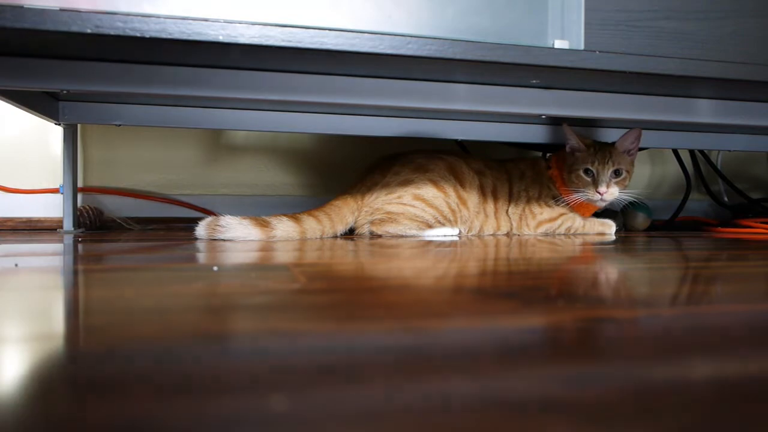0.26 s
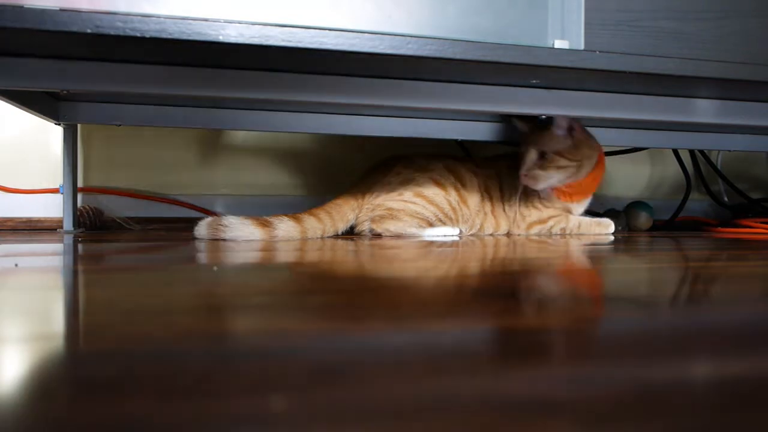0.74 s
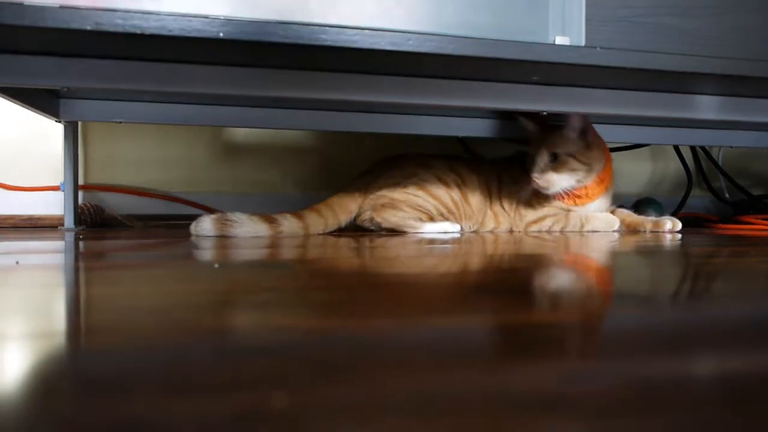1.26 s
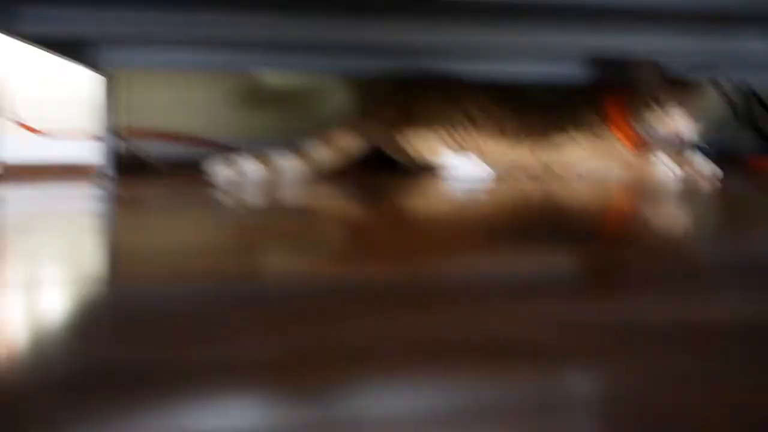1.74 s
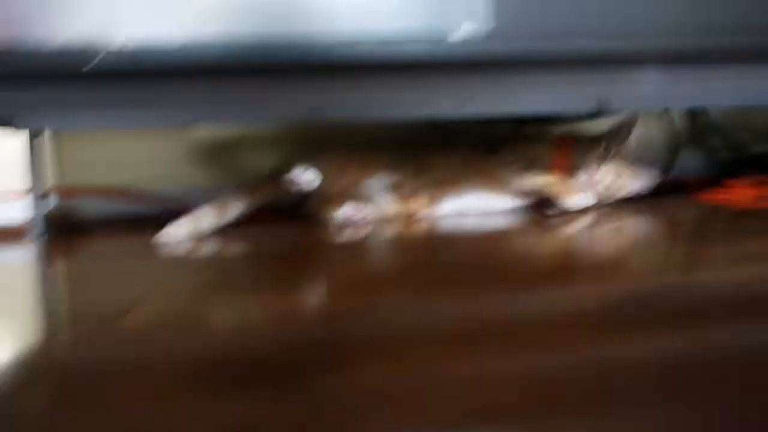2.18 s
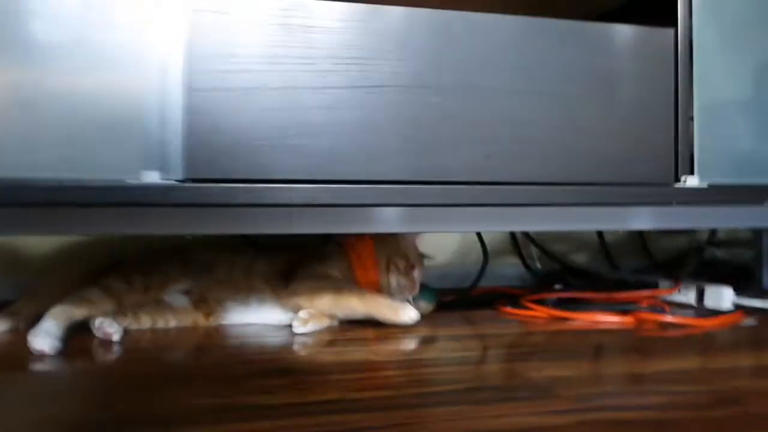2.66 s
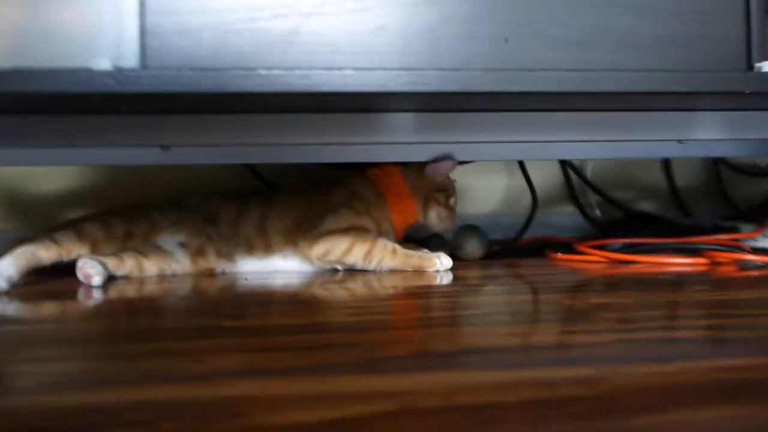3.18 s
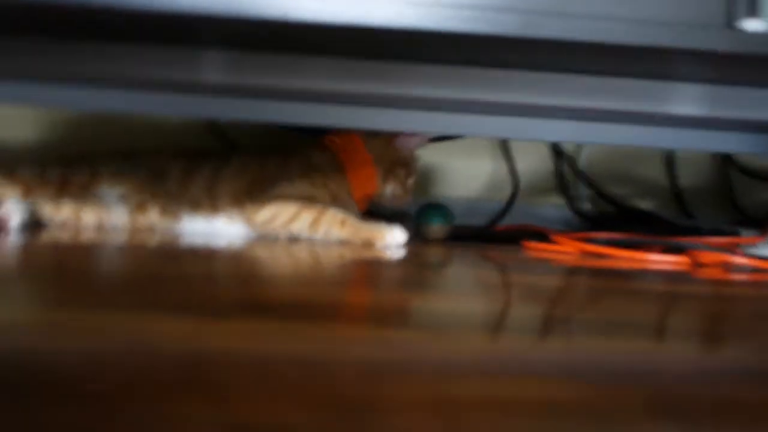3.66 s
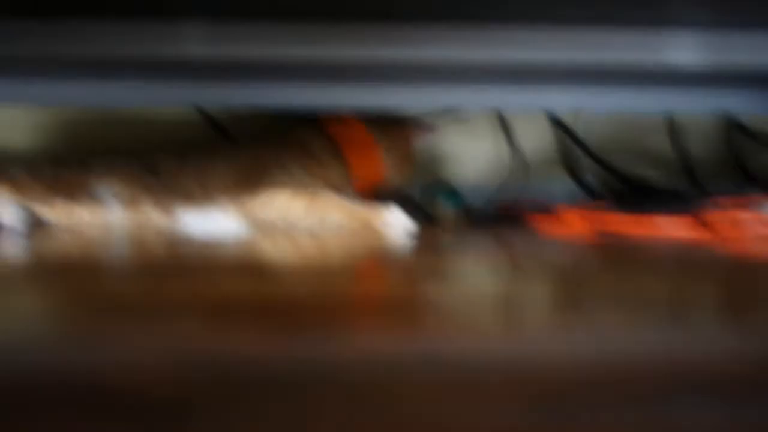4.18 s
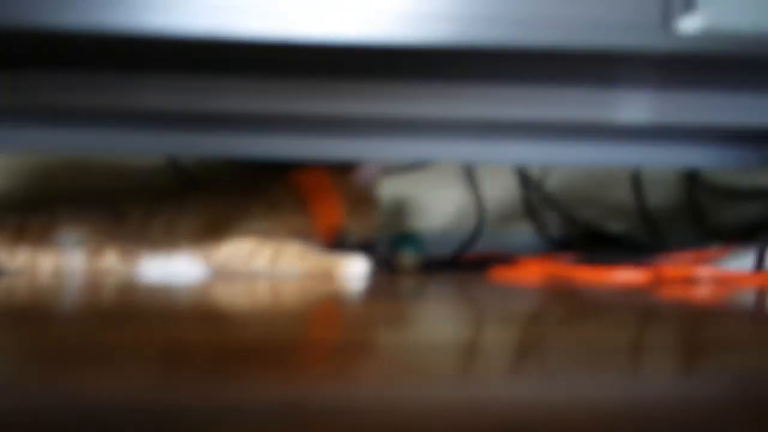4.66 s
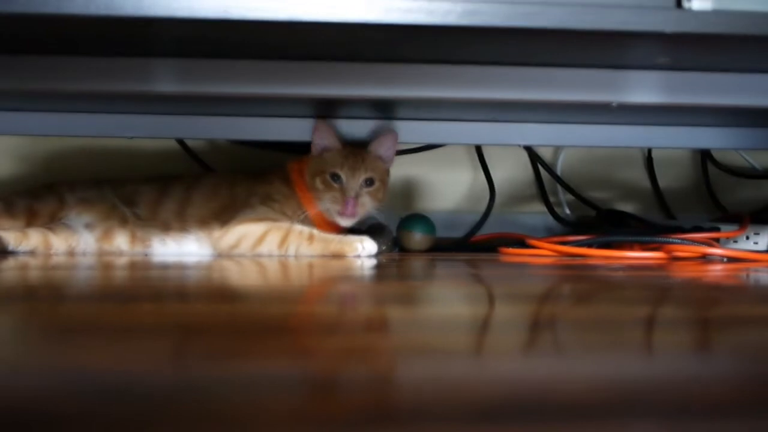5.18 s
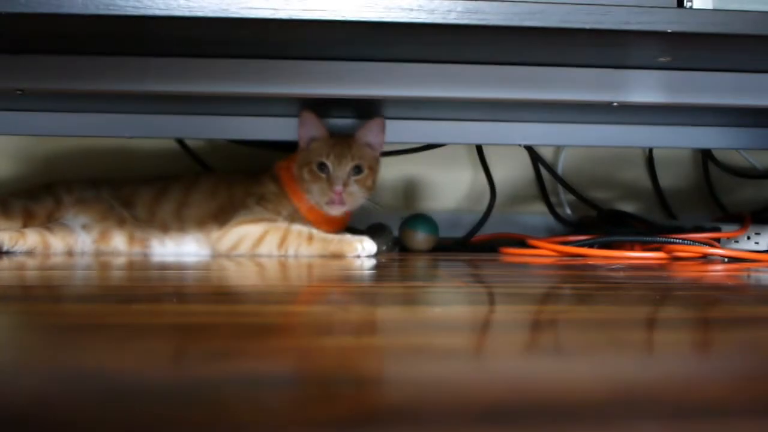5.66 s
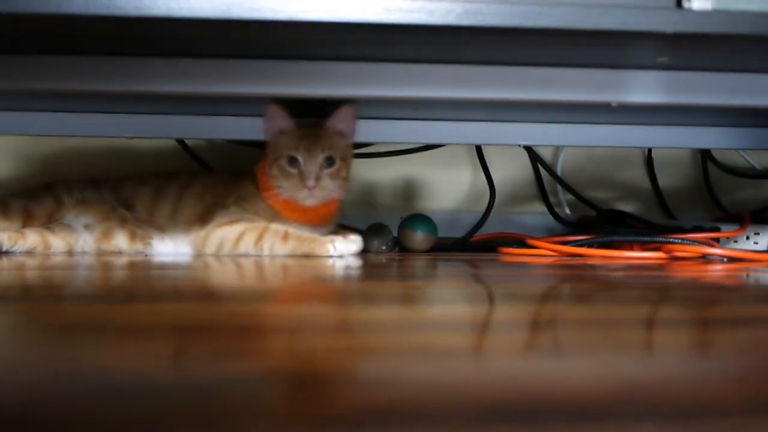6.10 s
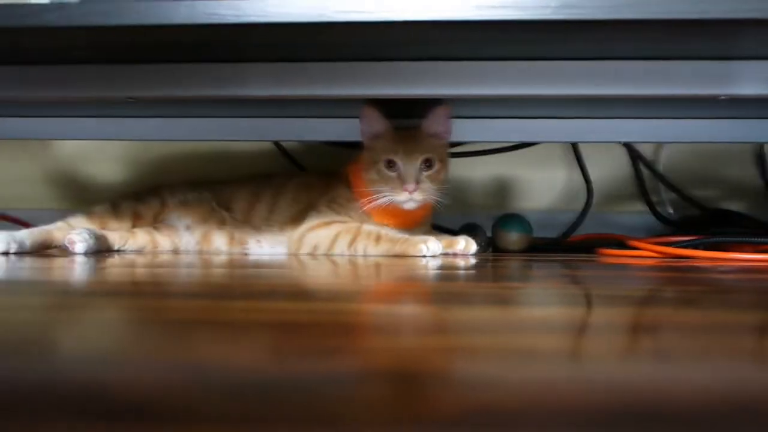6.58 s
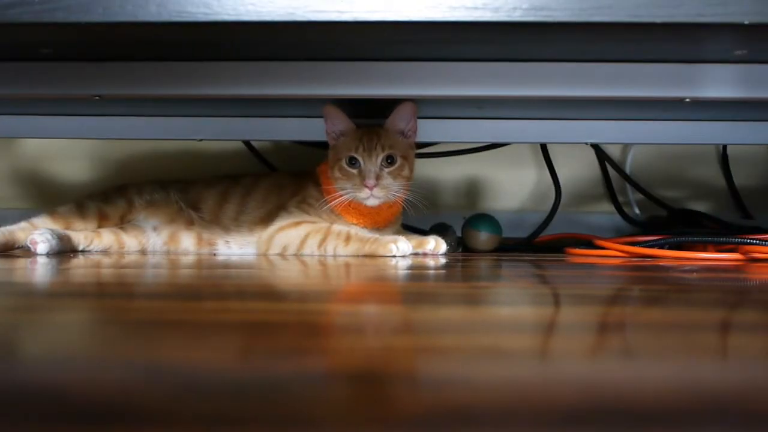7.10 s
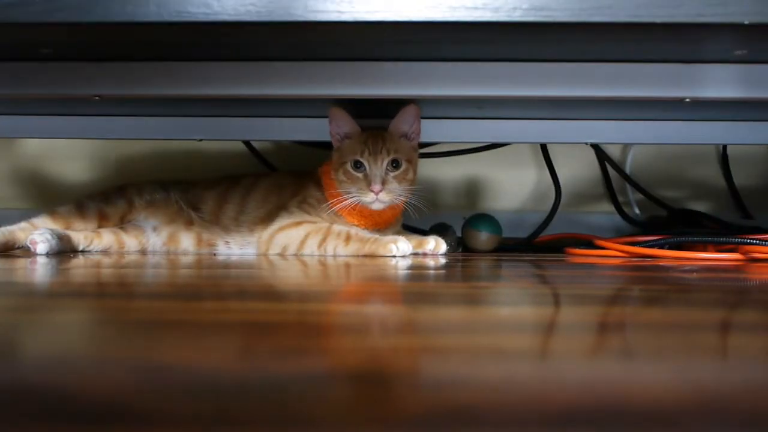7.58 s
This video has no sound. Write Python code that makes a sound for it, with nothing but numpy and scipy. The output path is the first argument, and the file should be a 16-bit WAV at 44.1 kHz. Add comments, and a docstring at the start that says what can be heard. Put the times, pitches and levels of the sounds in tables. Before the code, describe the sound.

A quiet indoor room murmurs softly throughout, with low rumble and faint hiss. From 0.7 to 1.0 seconds a cat under a low cabinet makes a few dull, padded knocks on a hardwood floor. Light finger rubs and small clicks on the microphone follow until about 1.9. Soft fur swishes and isolated paw thumps begin around 2.3; from 3.2 a short juddering skid leads into a quick flurry of knocks, strongest around 3.5 to 3.8, with small ticks and a short room echo. At 4.1 the microphone on the floor is bumped and dragged: very loud, close cracks, hollow thuds and rasping scrapes, peaking near 4.27 and continuing roughly until 5.1. Faint clicks trail to 5.4, then near quiet. Fainter rubs and light bumps return from 6.1 to 7.0, with a tiny thin squeak at 6.65. A last soft rub and a barely audible, longer squeak come around 7.4.

```python
"""A cat under a low cabinet knocks on a hard wooden floor, first briefly, then in a flurry after two seconds.
Near the first knocks, fingers rub the microphone on the floor; fur swishes softly before and into the flurry.
After four seconds the microphone is bumped and dragged, with sharp clicks and ticks; later come fainter rubs.
Two thin squeaks sound near the end, and a quiet room murmurs all along. Ringing tones make the knocks and
bumps, tiny random slips make the rubbing and the fur, and shaped noise makes the ticks, clicks and murmur."""
import sys
import numpy as np
from scipy import signal
from scipy.fft import rfft, irfft
from scipy.io import wavfile
from scipy.ndimage import uniform_filter1d, map_coordinates

SR = 44100
rng = np.random.default_rng(int(sys.argv[2]) if len(sys.argv) > 2 else 0)


def dump(signal):
    """Clip the signal to [-1, 1] and save it as 16-bit WAV at the path in sys.argv[1]."""
    limited = np.clip(np.atleast_2d(signal).T, -1, 1)
    pcm = np.round(limited * 32767).astype(np.int16)
    wavfile.write(sys.argv[1], SR, pcm)


N = 345744
TIME = np.arange(N) / SR
RING_TIME = TIME[:SR // 4]

# knocks of paws and body on the boards: [start_s, level_db, hardness_db, pitch_ratio]
PAW_KNOCKS = [(0.696, -32, -8, 0.71), (0.908, -37.5, -18, 1.17), (.936, -32.5, -19.5, 1.04),
              (.952, -34, -19, 1.1), (1.005, -27.5, 1.5, 1.13), (2.279, -30.5, 6, 1.34),
              (2.433, -34.5, -13.5, 1.22), (2.61, -43, -14, 0.61), (2.833, -25, 3.5, 1.035),
              (3.08, -37.5, -23, 1.05), (3.185, -22.5, 12.5, 1.09), (3.318, -26, -8, 1.2),
              (3.432, -25.5, -20.5, 1.053), (3.4702, -13.5, -3.5, 1.14), (3.504, -26.5, -6, 1.26),
              (3.513, -30, -12.5, 1.27), (3.594, -23.5, -12, 1.23), (3.625, -25.5, -14, 1.08),
              (3.702, -31, 15, 1.1), (3.709, -18.5, -8.5, 1.29), (3.753, -19, -4.5, 1.15),
              (3.793, -37, -9, 1.23), (3.855, -37, -18, 1.04)]
# tone of the paw juddering on the boards: [pitch_hz, level_db]
JUDDER_TONE = [(110, -27), (220, -10.5), (310, -2.5), (380, 7), (440, -2), (660, -21), (860, -18.5),
               (1010, -8.5), (1250, -32.5), (2600, -40), (4000, -45), (7000, -52), (12000, -80)]
# the skid of one paw, which weakens as it goes on
SKID_S, SKID_LENGTH_S, SKID_DB, SKID_SWELL_DB = 3.182, 0.15, -33.5, -12.5
SKID_ATTACK_S, SKID_RELEASE_T60_S = 0.0074, 0.09


def paws():
    """Knocks and a juddering skid ring the boards, and the room answers."""
    knocks = np.zeros((1, N))
    for start_s, level_db, hardness_db, pitch_ratio in PAW_KNOCKS:
        add(knocks, start_s, undb(level_db) * board(hardness_db, pitch_ratio))
    skid = push(SKID_S, SKID_LENGTH_S, SKID_DB, SKID_SWELL_DB, SKID_ATTACK_S, SKID_RELEASE_T60_S)
    slipping = slips(rate=1200, uneven=0.067, surge=0.067, surge_rate=70)
    judder = colour(slipping, JUDDER_TONE) * skid
    return knocks + judder + room(undb(-11.5) * knocks + undb(-9.5) * judder)


# what the boards ring with, before each blow varies it: [pitch_hz, level_db, t60_s]
BOARD_RINGS = [(160.3, -11.5, 0.13), (288.3, 3, 0.06), (358.7, 2, 0.06), (457, 4, 0.024),
               (622, -3.5, 0.029), (777, -1, 0.028), (984, -19, 0.046), (1160, -17, 0.0068)]
CONTACT_S = 0.00042  # limit for the hardest blow; a softer one pushes longer
PAD_HZ = 1340  # the soft paw dulls everything above this
SPOT_DB, SPOT_DETUNE = 2, 0.04  # scatter from spot to spot: dB, share of the pitch


def board(hardness_db, pitch_ratio=1):
    """One padded blow: hardness brings out the upper modes; each spot weights and detunes them anew."""
    contact_s = CONTACT_S * (1 + undb(-hardness_db))
    blow = 0
    for pitch_hz, level_db, t60_s in BOARD_RINGS:
        weight, detune = rng.standard_normal(2)
        octaves_up = np.clip(np.log2(pitch_hz / 350), -0.5, 1)
        gain = undb(level_db + hardness_db * octaves_up + SPOT_DB * weight)
        blow = blow + gain * ring(pitch_hz * pitch_ratio * (1 + SPOT_DETUNE * detune), t60_s, rise=contact_s)
    padded = edge(blow, PAD_HZ, "low", order=4)
    padded = edge(padded, 170 * pitch_ratio, "high")
    return padded / np.abs(padded).max()


# fur slides over the varnish: [fastest_moment_s, length_s, relative_level_db]
FUR_SWISHES = [(2.398, 0.013, -66), (2.66, 0.097, -52), (2.852, 0.036, -53), (2.993, 0.082, -69)]
# tone of the hair: [pitch_hz, level_db]
FUR_TONE = [(1500, -6), (3100, -11), (3700, 9), (4500, 3.5), (5300, 0), (6200, -25), (7600, -12),
            (11000, -38)]


def fur():
    """A soft, narrow hiss of hair on varnish; each swish gathers speed and trails off evenly."""
    speed = sum(undb(level_db) / (1 + (2 * (TIME - fastest_s) / length_s) ** 2)
                for fastest_s, length_s, level_db in FUR_SWISHES)
    hairs = slips(rate=10000, uneven=0.45, surge=0.36, surge_rate=55, channels=2)
    hiss = colour(hairs, FUR_TONE)
    return ports(undb(-2) * hiss[0], undb(-3.5) * hiss[1]) * speed


# rubs along the housing: [start_s, length_s, attack_s, relative_rasp_db, swell_over_the_rub_db,
# hiss_over_rasp_db, drag_over_rasp_db], the last two before the fixed balance of the layers
RUBS = [(1.048, 0.17, 0.0073, -63.5, -6, 7.5, -2), (1.185, 0.22, 0.011, -63.5, -5, 7.5, 2),
        (1.285, 0.046, 0.011, -61.5, 11, 9.5, 7.5), (1.329, .05, 0.0054, -59.5, -16, 10, 1),
        (1.417, 0.075, .008, -57.5, -4, -0.5, 13.5), (1.485, 0.064, 0.018, -51.5, 15, -3, 2.5),
        (1.634, 0.12, 0.028, -55.5, 2, -2.5, 1.5), (1.741, 0.13, .02, -56.5, -6, -2, -14),
        (4.101, 0.067, 0.0043, -52.5, -3, -2, 23.5), (4.16, 0.054, 0.0056, -42.5, 7.5, -7, 19),
        (4.31, 0.035, 0.012, -33.5, 1, -3.5, 9), (4.374, 0.11, .006, -36.5, -4, -4.5, 13),
        (4.468, 0.042, 0.0036, -35, -5, -4.5, 10), (4.512, 0.069, 0.0078, -38, 2.5, -5, 13),
        (4.587, 0.076, 0.0045, -33.5, -7.5, -2, 8.5), (4.661, 0.037, 0.0074, -38, -5, -3.5, 4),
        (4.703, 0.051, 0.008, -39.5, 12.5, -4, 6.5), (4.767, 0.04, 0.0044, -36, 16.5, -1, 6.5),
        (4.813, 0.044, 0.005, -31, -2, -2.5, 2.5), (4.861, 0.039, 0.0032, -42, 2, -2.5, 8.5),
        (4.905, 0.076, 0.012, -44.5, -6, -1.5, 6.5), (4.989, 0.066, 0.0087, -41, 8, -4, 8.5),
        (5.051, 0.051, 0.0099, -43.5, -7, -1.5, 7), (5.153, 0.21, 0.041, -70, 6, 6.5, 15.5),
        (6.071, 0.15, 0.013, -60, 4.5, -7.5, 9.5), (6.345, 0.054, 0.011, -54.5, 21, -3, 1.5),
        (6.407, 0.058, 0.012, -49.5, -5, -4.5, 8.5), (6.473, 0.085, 0.0073, -48.5, 7, -4, 4.5),
        (6.566, 0.074, 0.0087, -47, 0.5, -3.5, 7.5), (6.886, 0.12, 0.025, -53.5, -5, -3, 7),
        (6.962, 0.057, 0.032, -46.5, 0, -5.5, 4), (7.406, 0.058, 0.051, -52, 0, -17, 0.5)]
# low tone of the housing dragged along: [pitch_hz, level_db]
DRAG_TONE = [(50, -1), (90, -24), (165, -3), (235, -6.5), (300, -1.5), (358, 3), (430, -9.5), (495, -1),
             (580, -19), (780, -13.5), (1100, -27), (2500, -59)]
RUB_RELEASE_T60_S = 0.14  # the pressure of a rub lets go this quickly
GRIP_DB, GRIP_RATE = 0.5, 50  # the grip changes by chance: dB, times a second
# sheen, the finest hiss: each dB of hiss over the rasp, as on a lighter touch, adds SHEEN_GROWTH dB to it
SHEEN_HZ, SHEEN_DB, SHEEN_GROWTH = 6800, -4.5, 2.1


def rubbing():
    """Fine slips rasp and hiss, coarse ones shake the whole housing; one pressure drives them all."""
    rasp = scrape(slips(rate=2500, uneven=0.3, surge=0.12, surge_rate=130, channels=2))
    rasp = edge(rasp, 2600, "low", order=3)
    hiss = scrape(slips(rate=9000, uneven=0.4, surge=0.1, surge_rate=170, channels=2))
    hiss = edge(hiss, 2600, "high", order=3)
    sheen = edge(scrape(rng.standard_normal((2, N))), SHEEN_HZ, "high", order=3)
    coarse = slips(rate=1500, uneven=0.15, surge=0.15, surge_rate=45)
    drag = lean(undb(-4.5) * colour(coarse, DRAG_TONE), share=0.42)

    gain = np.zeros((4, N))  # rasp, hiss, sheen, drag
    for start_s, length_s, attack_s, rasp_db, swell_db, hiss_db, drag_db in RUBS:
        pressure = push(start_s, length_s, rasp_db, swell_db, attack_s, RUB_RELEASE_T60_S)
        layers = undb([0, hiss_db, SHEEN_DB + SHEEN_GROWTH * hiss_db, drag_db])
        gain = np.maximum(gain, np.outer(layers, pressure))  # the strongest rub wins
    gain = gain * undb(GRIP_DB * walk(GRIP_RATE))

    friction = undb(-4) * rasp * gain[0] + undb(2.5) * hiss * gain[1] + sheen * gain[2]
    return finger_gap(patchy(friction)) + drag * gain[3]


# friction moves the two microphone openings together: [pitch_hz, level_db]
TOGETHER_TONE = [(450, -6.5), (660, 9.5), (805, 17.5), (930, 11.5), (1250, 12), (2000, 0.5), (2900, -3.5),
                 (3600, 0), (4800, -2), (6200, -6.5), (7300, -8.5), (9300, -8.5), (11500, -15),
                 (15000, -38)]
# friction rocks them against each other: [pitch_hz, level_db]
ROCKING_TONE = [(450, -9), (570, 5.5), (740, -4), (960, 9), (1100, 6.5), (1300, 12.5), (1750, 1),
                (2700, -3), (3600, -6), (4600, -9.5), (5900, -13.5), (7500, -16), (9500, -18), (11500, -30),
                (15000, -70)]


def scrape(friction):
    """Two runs of friction shake the housing: one moves the openings together, one rocks them."""
    together = colour(friction[0], TOGETHER_TONE)
    rocking = undb(6) * colour(friction[1], ROCKING_TONE)
    return housing(ports(together, rocking))


PATCH_DB, PATCH_RATE = 3, 70  # flaring of single bands: dB, about this many times a second


def patchy(x):
    """The contact point keeps changing, so each half octave of the friction flares and fades on its own."""
    edges_hz = 700 * 2 ** (np.arange(8) / 2)
    below = [smooth_filter(x, hz, "low", order=4) for hz in edges_hz]
    bands = np.diff([0 * x] + below + [x], axis=0)
    out = 0
    for band in bands:
        flare = undb(PATCH_DB * walk(PATCH_RATE * rng.uniform(0.6, 1.4)))
        out = out + band * unit(flare)
    return out


# the gap between finger and housing echoes; it widens and narrows by chance, GAP_RATE times a second
GAP_ECHO_S, GAP_ECHO_SHARE, GAP_WANDER, GAP_RATE = 0.000904, 0.22, 0.303, 14


def finger_gap(x):
    """A short echo whose delay wanders, so that the peaks of the rasp shift from rub to rub."""
    lag = GAP_ECHO_S * SR * np.exp(GAP_WANDER * walk(GAP_RATE))
    echo = np.vstack([map_coordinates(port, [np.arange(N) - lag], order=3) for port in x])
    return (x + GAP_ECHO_SHARE * echo) / np.hypot(1, GAP_ECHO_SHARE)


# the housing bumps on the floor: [start_s, level_db, pitch_hz, t60_s]
FLOOR_BUMPS = [(4.0975, -4.5, 455, 0.0092), (4.099, -21.5, 714, 0.036), (4.103, -13.5, 337, 0.053),
               (4.11, -14, 377, 0.017), (4.17, -21, 400, 0.0078), (4.266, -0.5, 295, 0.019),
               (4.28, -9, 310, 0.018), (4.384, -14.5, 340, 0.048), (4.401, -16.5, 372, 0.047),
               (4.412, -15.5, 369, 0.08), (4.447, -20, 328, 0.056), (4.492, -28, 327, 0.045),
               (4.543, -17.5, 347, 0.12), (4.58, -10.5, 268, 0.02), (4.592, -9, 183, 0.037),
               (4.6, -12, 349, 0.073), (4.753, -17.5, 260, 0.035), (4.983, -28.5, 310, 0.15),
               (6.25, -35.5, 230, 0.0052), (6.407, -34, 357, 0.14), (6.485, -35, 360, 0.055),
               (6.529, -36, 361, 0.12), (6.56, -35, 356, 0.22), (6.605, -31.5, 361.6, 0.087),
               (7.007, -38.5, 335, 0.097)]
BUMP_LOW_T60_S = 0.06  # ring of the deeper mode under each bump


def bumps():
    """The housing meets the floor: a dull, damped thud with a deeper mode under it."""
    out = np.zeros((1, N))
    for start_s, level_db, pitch_hz, t60_s in FLOOR_BUMPS:
        deeper = ring(pitch_hz * 0.566, BUMP_LOW_T60_S, rise=0.012)
        thud = ring(pitch_hz, t60_s, rise=0.00053) + undb(-13) * deeper
        add(out, start_s, -undb(level_db) * thud / np.abs(thud).max())
    return lean(out, share=0.32) + undb(-18) * room(out)


# the housing catches and slips with a click: [start_s, level_db, t60_s]
HOUSING_CATCHES = [(1.004, -24.5, 0.024), (1.049, -33, 0.028), (1.156, -37, 0.023), (1.468, -35, .02),
                   (4.0974, -8.5, 0.05), (4.146, -28, 0.014), (4.208, -12.5, 0.027), (4.212, -9, 0.013),
                   (4.2652, -2, 0.013), (4.279, -22, .02), (4.319, -25, 0.03), (4.345, -21.5, 0.011),
                   (4.377, -22, 0.055), (4.449, -22, 0.037), (4.579, -12.5, 0.016), (4.594, -14.5, 0.03),
                   (4.6238, -9.5, 0.015), (4.794, -18, 0.016), (4.805, -19, 0.021), (4.832, -15, 0.024),
                   (4.865, -19.5, 0.023), (4.993, -24, .03), (5.251, -28.5, 0.042), (5.34, -32, 0.036),
                   (6.102, -38, .025), (6.303, -42, 0.01), (6.349, -35, 0.037), (6.367, -35, 0.027),
                   (6.483, -32, 0.036), (6.527, -31, 0.025), (6.555, -31, .025), (6.604, -34, .025),
                   (6.627, -32, 0.044), (6.88, -30, .022)]
# tone of the click: [pitch_hz, level_db]
CLICK_TONE = [(300, 7), (700, 13.5), (1200, 12.5), (2200, 2), (3800, 3.5), (4900, 5), (6200, -10),
              (8300, -3.5), (11000, -13), (15000, -18)]


def catches():
    """Sharp releases crack through the housing and rock the two openings against each other."""
    out = np.zeros((2, N))
    for start_s, level_db, t60_s in HOUSING_CATCHES:
        burst = rng.standard_normal((2, len(RING_TIME))) * fade(RING_TIME, t60_s)
        crack = housing(colour(burst, CLICK_TONE))
        rocking = crack[1] + undb(11) * resonance(crack[1], 1100, 1100)
        crack = ports(crack[0], rocking)
        add(out, start_s, undb(level_db) * crack / np.abs(crack).max())
    return out + undb(-21) * room(out.mean(axis=0))


# narrow resonances of the hollow housing: [pitch_hz, width_hz, level_over_the_direct_sound_db]
HOUSING_RINGS = [(1260, 25, 0.5), (1960, 33, -8.5), (2300, 91, -8), (2638, 42, 3.5), (3455, 105, 2.5),
                 (3775, 60, 2.5), (4040, 62, -1), (4180, 45, -3), (4400, 50, -2.5), (4734, 48.5, -4),
                 (5065, 17, 1.5), (7360, 100, 3)]


def housing(x):
    """The hollow housing adds its narrow resonances to whatever shakes it."""
    return x + sum(undb(level_db) * resonance(x, pitch_hz, width_hz)
                   for pitch_hz, width_hz, level_db in HOUSING_RINGS)


def lean(x, share, hz=385, width_hz=130):
    """The main resonance of the housing is stronger at the right opening."""
    return ports(x, -share * resonance(x, hz, width_hz))


# claws, cables and the housing tick: [start_s, level_db, centre_hz, t60_s, left_over_right_db]
SMALL_TICKS = [(1.002, -37, 7000, 0.014, 0), (1.445, -43, 4000, 0.029, 2), (2.895, -42, 4000, 0.018, -2),
               (3.183, -32, 1850, 0.014, 8), (3.183, -27.5, 3600, 0.012, 3),
               (3.1847, -30.5, 7960, 0.0098, 0), (3.277, -31, 7050, 0.036, 0.5),
               (3.701, -41, 4200, 0.24, 1), (3.727, -39, 6800, 0.094, 4), (4.1066, -16, 8100, 0.0088, -6),
               (4.111, -20.5, 8160, 0.013, 1), (4.175, -33, 7850, 0.0079, 2),
               (4.2656, -5, 8780, 0.0046, -18), (4.2657, -5, 4040, 0.0035, -13),
               (4.269, -23, 4360, 0.054, 11), (4.4219, -12.5, 4200, 0.021, 3.5),
               (4.623, -12.5, 4140, 0.017, 3), (4.687, -30, 7400, 0.021, -1), (4.771, -30, 7500, 0.012, 1),
               (4.885, -27, 5070, 0.014, 7), (5.251, -32.5, 8500, 0.015, -1), (5.343, -32, 3900, 0.025, 5),
               (6.881, -33, 3400, .02, 0)]


def ticks():
    """Small hard contacts: each is a short burst of noise around its own pitch, placed left or right."""
    out = np.zeros((2, N))
    for start_s, level_db, hz, t60_s, pan_db in SMALL_TICKS:
        burst = rng.standard_normal((2, len(RING_TIME))) * fade(RING_TIME, t60_s)
        burst = colour(burst, [(hz / 4, -16), (hz / 1.4, -12), (hz / 1.16, -1),
                               (hz * 1.03, 0), (hz * 1.45, -15), (hz * 3, -30)])
        burst = ports(burst[0], undb(0.5) * burst[1]) * undb([[pan_db / 2], [-pan_db / 2]])
        add(out, start_s, undb(level_db) * burst / np.abs(burst).max())
    return out + undb(-19) * room(out.mean(axis=0))


# faint thin squeaks: [start_s, length_s, start_hz, end_hz, level_db, waver_share_of_pitch]
THIN_SQUEAKS = [(6.646, 0.055, 5200, 4800, -53, 0.04), (7.36, .2, 4500, 4850, -70, 0.011)]


def squeaks():
    """Short wavering glides of a pure tone that swell and fade."""
    out = np.zeros((2, N))
    for start_s, length_s, start_hz, end_hz, level_db, waver in THIN_SQUEAKS:
        count = int(length_s * SR)
        hz = np.linspace(start_hz, end_hz, count) * (1 + waver * walk(900)[:count])
        tone = np.sin(2 * np.pi * np.cumsum(hz) / SR)
        add(out, start_s, undb(level_db) * np.hanning(count) * tone)
    return out


# tone of the room's reflections: [pitch_hz, level_db]
ROOM_TONE = [(70, -25), (160, 3.5), (260, -0.5), (370, -2), (600, 0.5), (1000, -6), (2500, 3),
             (9000, -11.5)]
ROOM_T60_S = 0.47


def room(x):
    """Dense reflections after a short gap; the close openings hear nearly the same bass."""
    t = TIME[:SR]
    arrival = np.clip((t - 0.006) / 0.0015, 0, 1)
    tail = rng.standard_normal((2, SR)) * fade(t, ROOM_T60_S) * arrival
    tail /= np.linalg.norm(tail[0])
    response = ports(tail[0], edge(tail[1], 1020, "high", order=3))
    return through(colour(x, ROOM_TONE), response)


# tone of the murmur common to both openings: [pitch_hz, level_db]
MURMUR_MID_TONE = [(20, -9.5), (40, -29), (70, -9), (130, -6.5), (300, -3.5), (630, -10), (1050, -15),
                   (1400, -16.5), (2230, -24), (5000, -26.5), (9550, -28), (11500, -37), (15500, -44)]
# tone of the murmur that differs between them: [pitch_hz, level_db]
MURMUR_SIDE_TONE = [(25, -54), (100, -17), (300, -9), (500, -8.5), (850, -5), (1700, -8), (2360, -14.5),
                    (3260, -17.5), (3830, -18), (15500, -35.5)]
# level of the murmur, falling overall and rising at the end: [time_s, level_db]
MURMUR_LEVEL = [(0, 9.5), (.12, 10), (.4, 2.5), (1, 5.5), (2.3, 4.5), (2.8, 1), (7.4, -0.5), (7.82, 5.5)]
# level of the low rumble: [time_s, level_db]
RUMBLE_LEVEL = [(0, -8), (1.2, 0), (3, -0.5), (6.8, 7.5), (7.3, 1), (7.8, 6.5)]
# level of the faint treble hiss, which drifts: [time_s, level_db]
HISS_LEVEL = [(.4, -2.5), (.75, 2), (1.9, -1.5), (2.25, 4), (2.6, -3), (3.22, 3.5), (3.3, 9.5), (3.45, 4.5),
              (3.85, 4), (4.03, -3), (5.2, 1.5), (6.099, 0.5), (6.85, 1.5), (7.08, -3.5), (7.38, -4.5),
              (7.46, 1.5), (7.8, 2)]
MURMUR_DRIFT_DB, MURMUR_DRIFT_RATE = 2.5, 6  # each octave swells on its own: dB, times a second


def air():
    """Room murmur that swells slowly and drifts in colour, under a fine hiss that comes and goes."""
    noise = rng.standard_normal((2, N))
    mid = undb(-59) * colour(noise[0], MURMUR_MID_TONE)
    side = undb(-61) * colour(noise[1], MURMUR_SIDE_TONE)
    tone = ports(mid, side)
    below = [smooth_filter(tone, hz, "low", order=3) for hz in (210, 450, 900, 1800)]
    rumble, above = below[0], tone - below[-1]
    murmur = sum(octave * undb(MURMUR_DRIFT_DB * walk(MURMUR_DRIFT_RATE))
                 for octave in np.diff(below, axis=0))
    hiss = smooth_filter(tone, (5000, 11000), "band", order=2)
    # "above" already holds the hiss once, so only the change is added
    hiss_change = hiss * (curve(HISS_LEVEL) - 1)
    return rumble * curve(RUMBLE_LEVEL) + murmur * curve(MURMUR_LEVEL) + above + hiss_change


def push(start_s, length_s, level_db, swell_db, attack_s, release_t60_s):
    """Gain of one sliding contact: it takes hold, swells or eases around its level, and lets go."""
    t = TIME - start_s
    held = undb(level_db + swell_db * (np.clip(t / length_s, 0, 1) - 0.5))
    return np.clip(t / attack_s, 0, 1) * held * fade(np.maximum(t - length_s, 0), release_t60_s)


def slips(rate, uneven, surge, surge_rate, channels=1):
    """Stick-slip: tiny uneven releases, about "rate" a second, in surges; all channels slip at once."""
    hit = rng.random(N) < rate / SR
    unevenness = uneven * rng.standard_normal(N).clip(-2, 2)
    surges = surge * walk(surge_rate).clip(-2, 1.7)
    return unit(hit * np.exp(unevenness + surges) * rng.standard_normal((channels, N)))


def walk(rate):
    """Smooth chance of rms 1 that takes a new turn "rate" times a second."""
    k = int(SR / rate)
    steps = np.repeat(rng.standard_normal(N // k + 1), k)[:N]
    return unit(uniform_filter1d(steps, k))


def ring(hz, t60, rise):
    """A damped mode that takes a short contact time to build up."""
    return np.sin(2 * np.pi * hz * RING_TIME) * fade(RING_TIME, t60) * (1 - np.exp(-RING_TIME / rise))


def fade(t, t60):
    """Exponential decay, 60 dB in t60."""
    return np.exp(-np.log(1000) * t / t60)


def resonance(x, hz, width_hz):
    """Band-pass with gain 1 at its centre."""
    return signal.lfilter(*signal.iirpeak(hz, hz / width_hz, fs=SR), x)


def edge(x, hz, kind, order=2):
    """Low-pass or high-pass."""
    return signal.sosfilt(signal.butter(order, hz, kind, fs=SR, output="sos"), x)


def smooth_filter(x, hz, kind, order):
    """Filter forwards and backwards, so nothing is delayed."""
    return signal.sosfiltfilt(signal.butter(order, hz, kind, fs=SR, output="sos"), x)


def colour(x, points, size=4096):
    """Causal filter of unit energy that follows (Hz, dB) points."""
    hz, db = np.transpose(points)
    bins = np.maximum(np.arange(size // 2 + 1) * SR / size, 1)
    gain = undb(np.interp(np.log(bins), np.log(np.maximum(hz, 1)), db))
    # folding the cepstrum forward makes the filter answer at once (minimum phase)
    cepstrum = irfft(np.log(gain))
    cepstrum[1:size // 2] *= 2
    cepstrum[size // 2 + 1:] = 0
    response = irfft(np.exp(rfft(cepstrum)))
    return through(x, response / np.linalg.norm(response))


def through(x, response):
    """Pass a sound through an impulse response."""
    wet = signal.fftconvolve(np.atleast_2d(x), np.atleast_2d(response), axes=-1)
    return wet[:, :x.shape[-1]]


def ports(mid, side):
    """Left and right openings from their common and opposite parts."""
    return np.vstack([mid + side, mid - side])


def curve(points):
    """Gain over time through (s, dB) points."""
    return undb(np.interp(TIME, *np.transpose(points)))


def undb(db):
    """Decibels to gain."""
    return 10 ** (np.asarray(db) / 20)


def unit(x):
    """Scale to rms 1."""
    return x / np.sqrt(np.mean(x ** 2))


def add(out, start_s, sound):
    """Mix a sound in at its start time."""
    start = int(start_s * SR)
    out[..., start:start + sound.shape[-1]] += sound[..., :N - start]


def scene():
    """Cat and handled housing, heard through openings that lose deep bass and top treble, over the room."""
    events = paws() + fur() + rubbing() + bumps() + catches() + ticks()
    events = edge(events, 139, "high", order=3)
    events = edge(events, 9670, "low", order=5)
    return events + squeaks() + air()


TOP_HZ = 15700


def record(dry):
    """The microphone signal sits slightly off zero, clips at full scale and loses the top treble."""
    clipped = np.clip(dry - 0.0029, -1, 1)
    return signal.sosfilt(signal.ellip(9, 0.2, 80, TOP_HZ, fs=SR, output="sos"), clipped)


dry = scene()
out = record(dry)
dump(out)
```